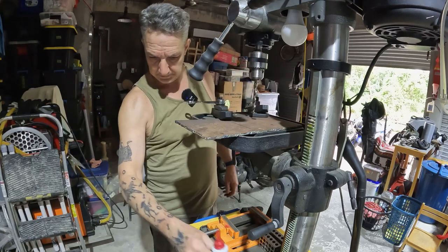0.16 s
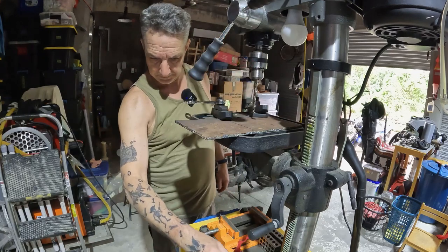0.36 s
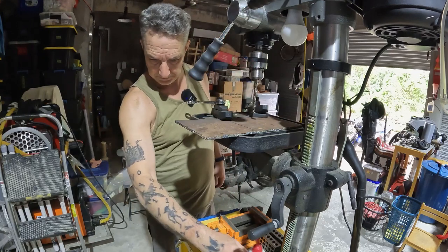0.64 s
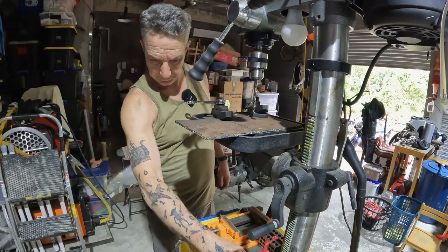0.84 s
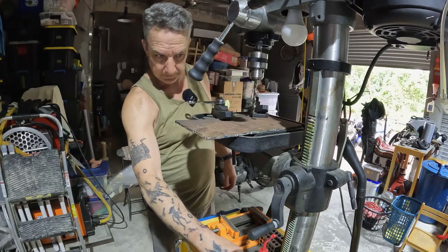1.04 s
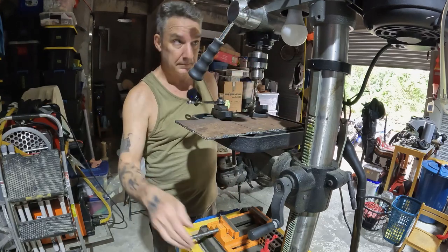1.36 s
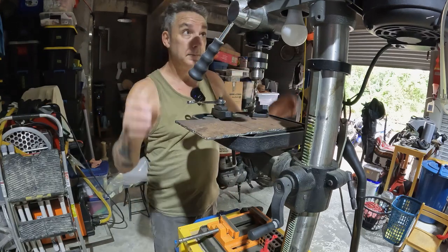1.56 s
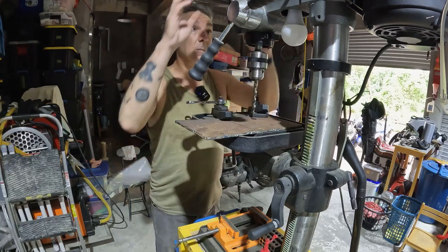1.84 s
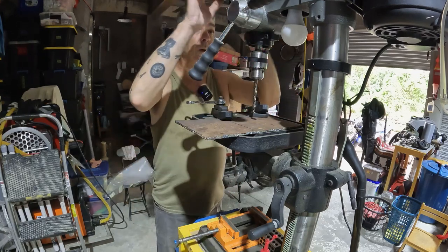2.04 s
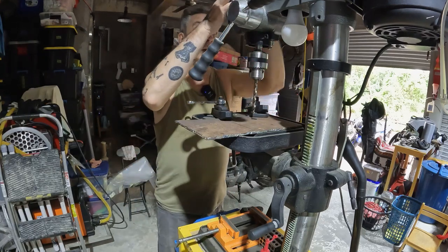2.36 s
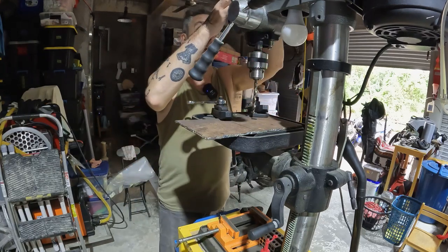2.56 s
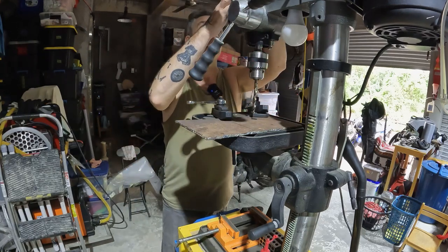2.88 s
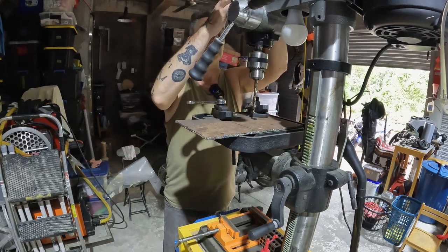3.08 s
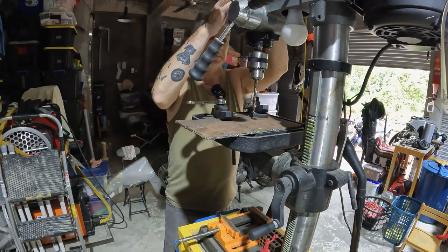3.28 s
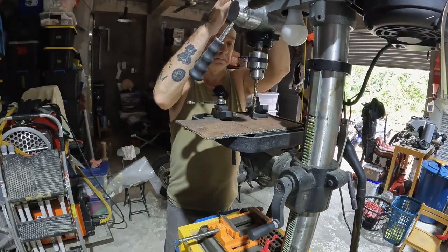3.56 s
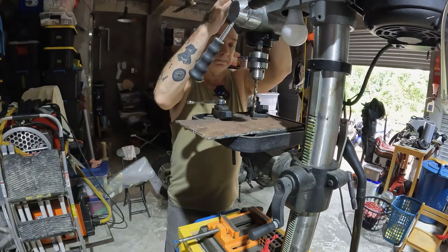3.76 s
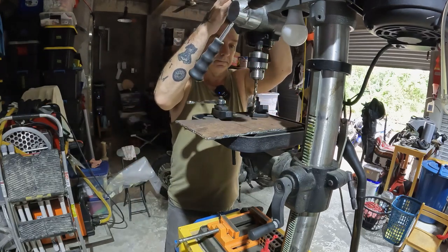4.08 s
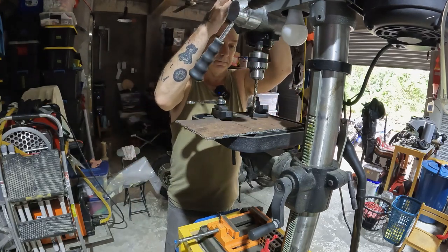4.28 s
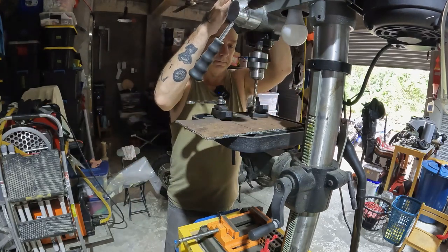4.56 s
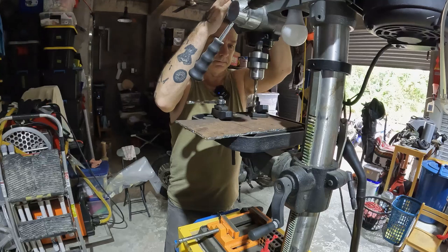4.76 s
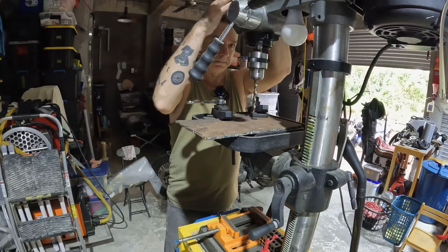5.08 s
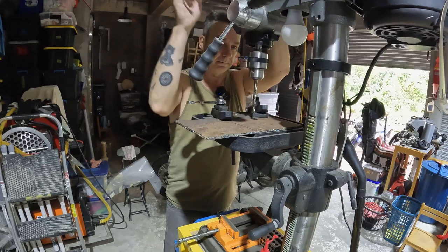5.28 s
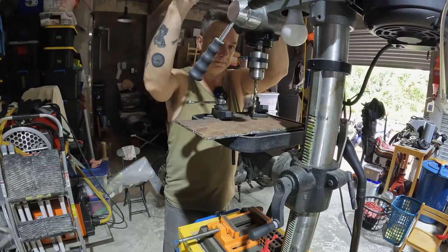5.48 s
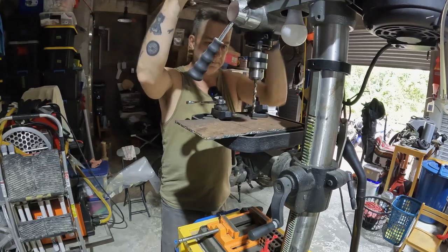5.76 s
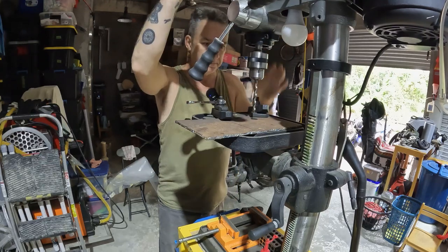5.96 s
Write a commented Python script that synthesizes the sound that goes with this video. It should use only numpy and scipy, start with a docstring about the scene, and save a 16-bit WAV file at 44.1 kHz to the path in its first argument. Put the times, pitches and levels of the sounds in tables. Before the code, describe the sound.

Light handling knocks and metallic feed clicks over faint air hiss, then a loud switch snap and a drill press running with hum and rattle.

```python
"""Still workshop air first: low draught rumble, even hiss and a faint electronic whine at two microphones.
Beside the column of a drill press a bottle wobbles to rest, a hand bumps the machine and the feed clicks:
decaying modes and filtered bursts, with sparse reflections of a cluttered home workshop.
The switch snaps, the induction motor growls up to speed and its starting switch clacks open; then partials
make a steady mains hum, and dense tiny impacts the rattle of belt, pulleys and spindle."""
import sys
import numpy as np
from scipy import signal
from scipy.fft import rfft, irfft
from scipy.io import wavfile
from scipy.ndimage import uniform_filter1d, minimum_filter1d

SR = 44100
rng = np.random.default_rng(int(sys.argv[2]) if len(sys.argv) > 2 else 0)


def waveform_to_disk(signal):
    """Save audio, clipped to [-1, 1], as 16-bit WAV at the path in sys.argv[1]."""
    frames = np.transpose(np.atleast_2d(signal))
    scaled = np.clip(frames, -1, 1) * 32767
    samples = np.round(scaled).astype(np.int16)
    wavfile.write(sys.argv[1], SR, samples)


N = 270333
T = np.arange(N) / SR
MAINS_HZ, SHAFT_HZ, BELT_HZ = 59.925, 29.92, 4.3  # BELT_HZ: laps of the belt per second
START_S, SPIN_UP_S = 4.425, 0.15
CUTOUT_S = 4.575  # the starting winding drops out


def amp(db):
    """Decibels to gain."""
    return 10 ** (np.asarray(db) / 20)


def evened(x):
    """Scales to an rms of one."""
    return x / np.sqrt(np.mean(x ** 2) + 1e-20)


def read(points, hz):
    """Reads a curve of (Hz, value) points on a log-frequency axis."""
    f, value = np.transpose(points)
    return np.interp(np.log(hz + 1), np.log(f + 1), value)


def add(mix, s, sound):
    """Mixes a sound in at s seconds."""
    part = mix[round(s * SR):][:len(sound)]
    part += sound[:len(part)]


def since(s):
    """Seconds gone by after a moment, zero before it."""
    return np.maximum(T - s, 0)


def colour(x, points, tilt_db=0, size=4096):
    """Causal minimum-phase filter of unit energy with the given spectrum, falling away beyond its ends."""
    hz = np.abs(np.fft.fftfreq(size, 1 / SR)) + 1
    beyond_octaves = np.abs(np.log2(hz / np.clip(hz, points[0][0], points[-1][0])))
    tilt_octaves = np.log2(np.clip(hz, 500, 6000) / 1000)
    db = np.maximum(read(points, hz) + tilt_db * tilt_octaves - 18 * beyond_octaves, -100)
    log_spectrum = np.conj(signal.hilbert(np.log(amp(db))))
    taps = np.fft.ifft(np.exp(log_spectrum)).real
    return signal.fftconvolve(x, taps / np.linalg.norm(taps))[:len(x)]


def wander(rate_hz):
    """Slow random drift of rms one: noise with a Gaussian low-pass."""
    s = np.arange(0, T[-1] + 1, 0.001)
    hz = np.fft.rfftfreq(len(s), s[1])
    slow = irfft(rfft(rng.standard_normal(len(s))) * np.exp(-(hz / rate_hz) ** 2), len(s))
    return evened(np.interp(T, s, slow))


def throb(turns, depth):
    """A gain that swells once a turn."""
    return evened(np.exp(depth * np.cos(2 * np.pi * turns)))


def line(turns, waver, waver_hz):
    """A partial of rms one whose strength and phase waver."""
    sway = 1 + waver * (wander(waver_hz) + 1j * wander(waver_hz)) / np.sqrt(2)
    return evened((sway * np.exp(2j * np.pi * (turns + rng.random()))).real)


def swell(peak_s, peak_db, rise_db_per_s, fall_db_per_s):
    """A gain that starts at switch-on, climbs to one peak and falls away again."""
    below_db = np.maximum(rise_db_per_s * (peak_s - T), fall_db_per_s * (T - peak_s))
    return amp(peak_db - below_db) * (T > START_S)


def burst(t60, spectrum, tilt_db=0):
    """A contact: a dense cluster of modes, made as coloured random signs that die away."""
    t = T[:SR // 2]
    return colour(rng.choice([-1., 1.], len(t)) * amp(-60 * t / t60), spectrum, tilt_db)


def ring(modes, rise_s=0.0011):
    """Decaying modes of a struck body, which take a moment to build up."""
    t = T[:SR // 2]
    tones = sum(amp(db - 60 * t / t60) * np.sin(2 * np.pi * hz * t) for hz, db, t60 in modes)
    return tones * (1 - np.exp(-t / rise_s))


def room(x, wet_db):
    """Adds the workshop's sparse reflections, each band dying at its own speed."""
    # Workshop reverberation. Each row: frequency in Hz, t60 in seconds.
    reverb_t60 = [(150, 0.072), (600, 0.61), (3000, 0.49), (8000, 0.09), (15000, 0.048)]
    t = T[:SR // 2]
    taps = rng.standard_normal(SR // 2) * (rng.random(SR // 2) < 0.08) * (t > 0.005)
    hz, frame_s, bands = signal.stft(taps, SR, nperseg=256)
    decay = amp(-60 * frame_s / read(reverb_t60, hz)[:, None])
    tail = signal.istft(bands * decay, SR, nperseg=256)[1]
    return x + amp(wet_db) * signal.fftconvolve(x, tail / np.linalg.norm(tail))[:N]


def still_air(level_db=-38):
    """Draught rumble, unlike at the two microphones, under an even hiss and a faint electronic whine."""
    # Spectrum of the still workshop. Each row: frequency in Hz, relative level in dB per Hz.
    air_spectrum = [(4.7, -2), (8.0, -0.5), (19, -5), (25, -11.5), (33, -15.5), (43, -20.5), (167, -19.5),
                    (196, -25), (245, -19.5), (278, -23.5), (419, -25.5), (523, -30), (741, -29.5),
                    (1310, -38), (15500, -43.5)]
    # How alike left and right are. Each row: frequency in Hz, likeness from 0 to 1.
    likeness = [(20, 0.52), (60, 0.54), (150, 0.98), (400, .99), (1500, 0.94), (3200, 0.9), (5000, 0.77),
                (14000, 0.6)]
    # Electronic whine. Each row: frequency in Hz, rms level in dB.
    whine_tones = [(2000, -72), (12000, -67)]
    hz = np.fft.rfftfreq(N, 1 / SR)
    left, other = rfft(rng.standard_normal((2, N)))
    same = read(likeness, hz)
    right = same * left + np.sqrt(1 - same ** 2) * other
    pair = irfft(np.array([left, right]) * amp(read(air_spectrum, hz)), N)
    whine = sum(amp(db) * np.sqrt(2) * np.sin(2 * np.pi * f * T) for f, db in whine_tones)
    return amp(level_db) * evened(pair) + whine


def knock(blows, modes, contact, contact_t60, contact_db, soften_db_per_s):
    """Several quick blows ring one hollow body; the contact gets softer from blow to blow."""
    out = np.zeros(N)
    for s, ring_db in blows:
        hardness = amp(contact_db - soften_db_per_s * (s - blows[0][0]))
        add(out, s, amp(ring_db) * ring(modes) + hardness * burst(contact_t60, contact))
    return out


def bottle():
    """A bottle wobbles to rest on a toolbox, each blow ringing low modes under a short contact noise."""
    # Blows. Each row: start in seconds, gain of the ring in dB.
    blows = [(.7303, -35), (.7435, -28.5), (.7500, -42), (.7745, -27), (.7840, -32), (.7935, -35)]
    # Modes. Each row: frequency in Hz, relative level in dB, t60 in seconds.
    modes = [(323, -1.5, 0.12), (336, 0.5, 0.13), (440, -5, 0.058), (500, -4, 0.056), (583, -21, .07),
             (740, -20, .08)]
    # Contact noise. Each row: frequency in Hz, relative level in dB per Hz.
    contact = [(120, -30), (300, 0), (480, 16.5), (850, 2.5), (1600, -6.5), (3200, -15.5), (4450, -5.5),
               (5600, -23), (14000, -24)]
    return knock(blows, modes, contact, contact_t60=0.082, contact_db=-25.5, soften_db_per_s=330)


def head_bump():
    """A hand bumps the head of the machine, whose modes ring longer than the bottle's."""
    # Blows. Each row: start in seconds, gain of the ring in dB.
    blows = [(1.9345, -36), (1.9415, -25), (1.9495, -23), (1.9640, -26), (1.9820, -34), (1.9970, -26.5),
             (2.0130, -35)]
    # Modes. Each row: frequency in Hz, relative level in dB, t60 in seconds.
    modes = [(98, -14, 0.17), (262, -16, .1), (266, -2.5, 0.19), (316, 2, 0.18), (369, -5, 0.21),
             (409, -3.5, 0.19), (491, -6, 0.11), (578, -1.5, 0.13), (772, -7, 0.15)]
    # Contact noise. Each row: frequency in Hz, relative level in dB per Hz.
    contact = [(100, -33), (300, 9), (700, -13), (1100, -12.5), (1700, -21), (2800, -15), (4500, -28.5),
               (7200, -26.5), (14000, -44)]
    return knock(blows, modes, contact, contact_t60=0.11, contact_db=-26, soften_db_per_s=80)


def feed_clicks(body_t60=0.064, ping_hz=2795, ping_db=-11, ping_t60=0.022):
    """Light metal clicks, and one soft dull scuff after the second, each with a low ring, ping and bounce."""
    # Clicks and scuff. Each row: start in seconds, level in dB, t60 in seconds, treble tilt in dB per octave,
    # body ring in Hz, body ring in dB relative to the row's level.
    clicks = [(2.3115, -25.5, 0.039, 1.5, 802, -4), (2.6292, -34, 0.061, 6, 448, 5.5),
              (2.678, -44, 0.12, -2, 580, 11), (2.7236, -40, 0.056, 0, 673, -3),
              (2.9483, -37, .025, 2.5, 715, -8), (3.066, -31.5, .024, 0, 760, -19),
              (3.4551, -28, 0.028, 0, 685, -4), (3.9014, -33.5, 0.02, 0, 720, -8)]
    # What the feed rings with. Each row: frequency in Hz, relative level in dB per Hz.
    feed_spectrum = [(200, -27), (500, -1.5), (900, 3.5), (1200, -1.5), (1550, -12), (1950, -7),
                     (2250, -11), (3100, -8.5), (4000, -21), (5300, -19), (6600, -19), (8500, -27),
                     (12000, -34)]
    bounce_s, bounce_db = 0.0145, -8.5  # the loose handle drops back: delay and relative level
    out = np.zeros(N)
    for s, db, t60, tilt_db, body_hz, body_db in clicks:
        tones = ring([(body_hz, body_db, body_t60), (ping_hz, ping_db, ping_t60)])
        add(out, s, amp(db) * (burst(t60, feed_spectrum, tilt_db) + tones))
        add(out, s + bounce_s, amp(db + bounce_db) * burst(t60, feed_spectrum, tilt_db))
    return out


def contacts(bursts, spectrum):
    """Sprung metal slams and dies away, each row one decaying burst."""
    out = np.zeros(N)
    for s, db, t60 in bursts:
        add(out, s, amp(db) * burst(t60, spectrum))
    return out


def power_switch():
    """The switch snaps over in a few quick contacts, the last the loudest, after a soft lead-in."""
    # Lead-in, then contacts. Each row: start in seconds, level in dB, t60 in seconds.
    snaps = [(4.4190, -21, .03), (4.4232, -10, .016), (4.4258, -1, 0.053), (4.4292, 3, 0.009),
             (4.4318, 9.5, 0.0093)]
    # Ring of the switch. Each row: frequency in Hz, relative level in dB per Hz.
    switch_spectrum = [(200, -16), (650, -11), (850, -5), (1400, -11), (2100, -15), (3100, 3), (4100, -17),
                       (4900, -9), (5500, -4.5), (7000, -3), (9000, -14.5), (10500, -12.5), (13000, -27),
                       (15500, -21)]
    return contacts(snaps, switch_spectrum)


def starting_switch():
    """The motor's centrifugal starting switch clacks open with a long faint tail, then two faint ticks."""
    # Clack, its tail and two ticks. Each row: start in seconds, level in dB, t60 in seconds.
    clack_and_ticks = [(4.5635, -17.5, 0.081), (4.5760, -33, 0.55), (4.8250, -43, 0.045),
                       (4.8635, -36, 0.027)]
    # Ring of the starting switch. Each row: frequency in Hz, relative level in dB per Hz.
    cutout_spectrum = [(1500, -11), (4000, -18), (5200, -11), (6400, -1), (7800, -8), (10000, -18),
                       (12000, -18), (15500, -29)]
    return contacts(clack_and_ticks, cutout_spectrum)


def spin_up():
    """Shaft speed as a share of full: it climbs evenly from switch-on."""
    return np.clip((T - START_S) / SPIN_UP_S, 0, 1)


def run_up(buzz=0.2):
    """Starting torque pulses at twice the mains rate and shakes the head while the belt scuffs."""
    # Colour of the growl. Each row: frequency in Hz, relative level in dB per Hz.
    growl_spectrum = [(120, -22), (200, -33), (232, 7), (270, -0.5), (330, -0.5), (420, -3), (490, 1.5),
                      (610, -3.5), (730, 4.5), (840, -13.5), (950, -5.5), (1300, -15.5), (2600, -18.5),
                      (4200, -30.5)]
    # Colour of the belt scuff. Each row: frequency in Hz, relative level in dB per Hz.
    scuff_spectrum = [(3000, -8), (6000, -3), (8900, -5), (9500, 1.5), (10100, -10.5), (15000, -27)]
    # both build to a peak and fall away as the rotor catches up
    shaking = swell(peak_s=4.522, peak_db=-5.5, rise_db_per_s=95, fall_db_per_s=180)
    slipping = swell(peak_s=4.505, peak_db=-28.5, rise_db_per_s=220, fall_db_per_s=114)
    growl, scuff = rng.standard_normal((2, N)) * throb(2 * MAINS_HZ * T, buzz)
    return colour(growl * shaking, growl_spectrum) + colour(scuff * slipping, scuff_spectrum)


def impacts(grain_db):
    """Dense clicks of uneven size."""
    size = amp(grain_db * np.minimum(rng.exponential(1, N), 4))
    struck = rng.random(N) < 0.2
    return evened(rng.standard_normal(N) * size * struck)


def rattle(repeat, grain_db, buzz, lurch, wobble):
    """Impacts, partly the same on each belt lap, bunched by torque pulses, pulley wobble and loose play."""
    lap = np.resize(impacts(grain_db)[:round(SR / BELT_HZ)], N)
    hits = np.sqrt(repeat) * lap + np.sqrt(1 - repeat) * impacts(grain_db)
    torque = throb(2 * MAINS_HZ * T, buzz)
    pulley = throb(SHAFT_HZ * T, wobble)
    loose_play = np.exp(lurch * wander(37.4))
    return evened(hits * torque * pulley * loose_play)


def drive(settle_s=0.23):
    """Belt, pulleys and spindle shake the casting and its sheet-metal cover once they turn."""
    # Colour of the low rumble. Each row: frequency in Hz, relative level in dB per Hz.
    rumble_spectrum = [(90, -40.5), (160, -28.5), (205, -13.5), (250, -0.5), (300, 3.5), (340, 2),
                       (390, -4.5), (440, -1.5), (580, 0), (720, -7), (860, -9.5), (1120, -13),
                       (1300, -18.5), (2200, -43)]
    # Colour of the chatter. Each row: frequency in Hz, relative level in dB per Hz.
    chatter_spectrum = [(900, -8), (1500, 1.5), (1900, 0), (2100, 0), (2600, 4.5), (3000, -0.5),
                        (3500, -6.5), (4200, -11), (5000, -18), (5700, -10.5), (6800, -21.5), (10000, -34)]
    # Colour of the spindle's hiss. Each row: frequency in Hz, relative level in dB per Hz.
    hiss_spectrum = [(4000, 0.5), (5800, -2), (7200, -1.5), (8400, 0), (9600, -1.5), (11000, -9),
                     (15000, -22)]
    turning = spin_up() ** 2
    # rumble and chatter begin low and settle to their full level
    unsettled = np.exp(-since(CUTOUT_S) / settle_s)
    rumble = rattle(repeat=0.47, grain_db=2.5, buzz=0.1, lurch=0.098, wobble=0.025)
    rumble = rumble * amp(-19 - 5.5 * unsettled)
    chatter = rattle(repeat=0.17, grain_db=1.5, buzz=0.084, lurch=0.16, wobble=0.11)
    chatter = chatter * amp(-35.5 - 9 * unsettled)
    # the hiss comes in slowly, then eases
    hiss = rattle(repeat=0.1, grain_db=0.5, buzz=0.16, lurch=0.15, wobble=0.06)
    hiss = hiss * swell(peak_s=5.45, peak_db=-47, rise_db_per_s=26, fall_db_per_s=2.5)
    low = colour(rumble * turning, rumble_spectrum)
    return low + colour(chatter * turning, chatter_spectrum) + colour(hiss * turning, hiss_spectrum)


def whistle(start_db=-68, growth_db_per_s=9):
    """One narrow, wavering tone of the spindle that grows as it runs."""
    level_db = start_db + growth_db_per_s * since(START_S)
    return amp(level_db) * spin_up() * line(4280 * T, waver=1.0, waver_hz=18)


def field(attack_s=0.029, inrush_db=5.5, sag_db=-7, dip_db=-6, recover_s=0.18):
    """Hum strength: high on the starting current, sagging with speed, low after the cut-out, then steady."""
    starting_db = inrush_db + sag_db * spin_up() ** 2
    running_db = dip_db * np.exp(-(since(CUTOUT_S) / recover_s) ** 2)
    level_db = uniform_filter1d(np.where(T < CUTOUT_S, starting_db, running_db), size=1500)
    return np.minimum(since(START_S) / attack_s, 1) * amp(level_db)


def motor():
    """Iron hums on even mains multiples; the shaft, slipping a little behind, adds orders and bearing whine."""
    # Magnetic hum. Each row: multiple of the mains, level in dB, unsteadiness from 0 to 1.
    hum_partials = [(2, -40, 0.08), (4, -21, 0.07), (6, -22.5, 0.32), (8, -29, 0.57), (10, -30.5, 0.24),
                    (12, -40, 1), (14, -37, 1)]
    # Motor shaft and pulley. Each row: multiple of the shaft speed, level in dB.
    shaft_orders = [(5, -51), (6, -44), (10, -33), (11, -28), (14, -37), (15, -36), (19, -30), (20, -34),
                    (23, -44), (24, -40), (31, -60), (33, -39.5), (37, -64)]
    # Dry whine of the bearings. Each row: frequency at full speed in Hz, level in dB.
    bearing_tones = [(1139, -52), (1176, -46), (1276, -53), (1636, -54), (1863, -53.5), (2256, -60),
                     (2568, -69), (2869, -56)]
    speed = spin_up()
    running = np.cumsum(speed) / SR  # seconds' worth of turning at full speed
    hum = sum(amp(db) * line(k * MAINS_HZ * T, waver, waver_hz=4.3) for k, db, waver in hum_partials)
    shaft = sum(amp(db) * line(k * SHAFT_HZ * running, waver=0.69, waver_hz=2.9) for k, db in shaft_orders)
    bearings = sum(amp(db) * line(hz * running, waver=0.86, waver_hz=8.4) for hz, db in bearing_tones)
    return field() * hum + speed ** 2 * (shaft + bearings)


def scene():
    """Handling noises, then the machine, all close and central in the two-microphone workshop air."""
    handling = room(bottle() + head_bump(), wet_db=-15.5) + room(feed_clicks(), wet_db=-12)
    switches = room(power_switch() + starting_switch(), wet_db=-23.5)
    machine = room(run_up() + drive(), wet_db=-15.5) + motor() + whistle()
    return still_air() + handling + switches + machine


def record(dry, ceiling_db=3, release_db_per_s=250, edge_hz=15800):
    """A limiter rides the loudest peaks and lets go quickly, what passes it clips; then the band limit."""
    over_db = 20 * np.log10(np.maximum(np.abs(dry).max(0) / amp(ceiling_db), 1))
    held_db = np.maximum.accumulate(over_db + release_db_per_s * T) - release_db_per_s * T
    gain = uniform_filter1d(minimum_filter1d(amp(-held_db), size=31), size=31)
    clipped = np.clip(dry * gain, -1, 1)
    low_pass = signal.firwin(511, edge_hz, window=("kaiser", 9), fs=SR)
    return signal.oaconvolve(clipped, low_pass[None], "same")


dry = scene()
out = record(dry)
waveform_to_disk(out)
```